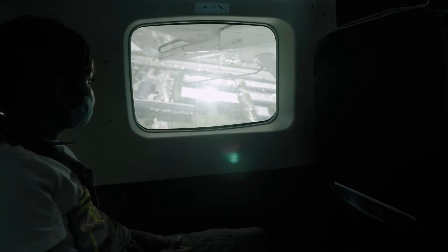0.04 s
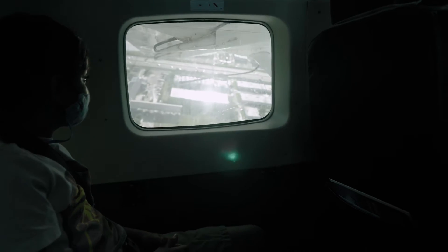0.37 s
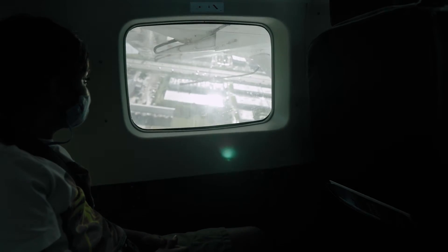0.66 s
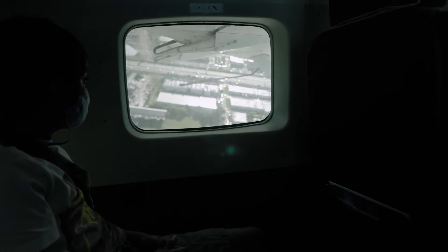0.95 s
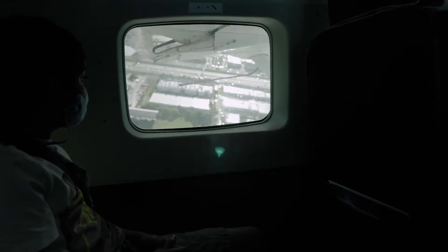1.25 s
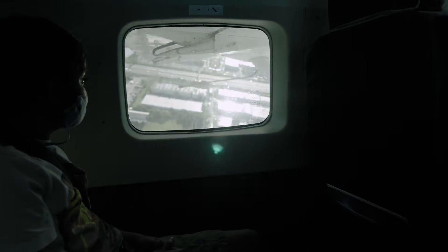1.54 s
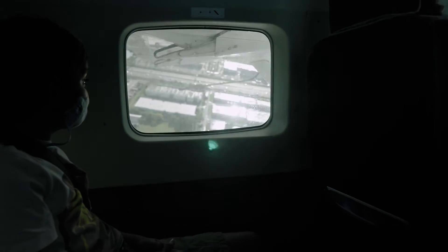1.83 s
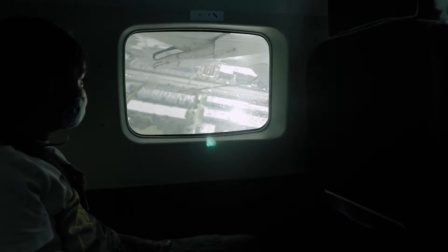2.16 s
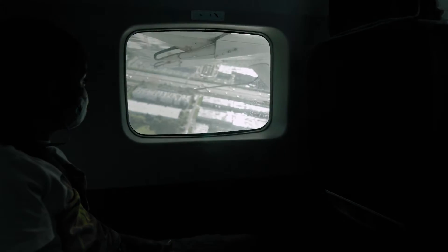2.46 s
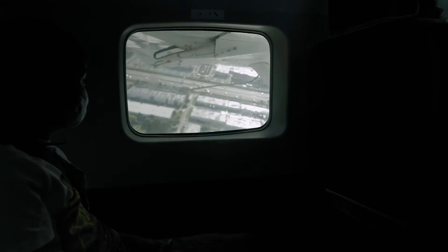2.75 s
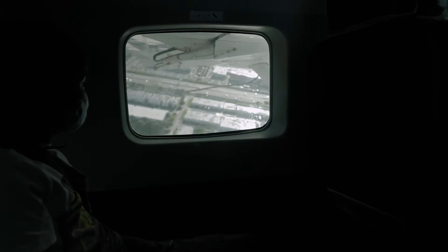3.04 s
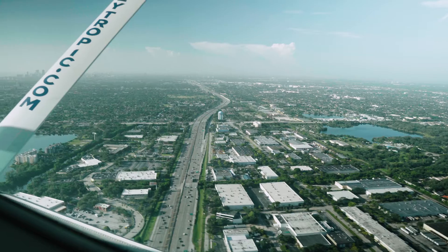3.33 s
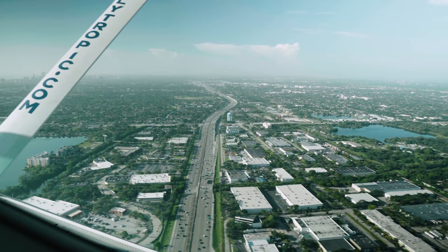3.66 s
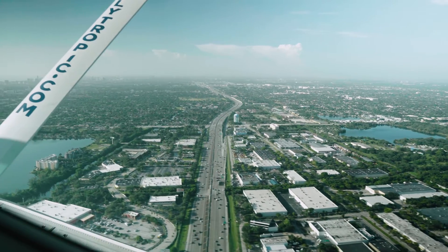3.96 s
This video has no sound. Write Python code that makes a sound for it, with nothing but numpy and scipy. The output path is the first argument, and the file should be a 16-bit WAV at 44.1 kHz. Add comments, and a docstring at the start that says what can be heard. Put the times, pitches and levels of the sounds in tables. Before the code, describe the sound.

Heard from inside a small cruising plane, the propeller drones steadily under a rush of air and a faint high whine. Late on, the sound shifts to a spot by the wing, with more drone and less air.

```python
"""A steady propeller drone fills the cabin of a small turboprop in cruise, beaten out by the blades. Air rushes
over the fuselage, the turbine whines thinly above it, and the propeller shaft and engine accessories hum
faintly. A loose panel taps once. Near the end the sound crossfades from a rear seat to a place by the wing
strut: more drone, less rush."""
import sys
import numpy as np
from scipy import signal
from scipy.fft import rfft, irfft
from scipy.io import wavfile

SR = 44100
rng = np.random.default_rng(int(sys.argv[2]) if len(sys.argv) > 2 else 0)


def materialize(psi):
    """Save the field psi as 16-bit PCM at rate SR to the path in sys.argv[1].

    A 1-D psi becomes a single channel; in a 2-D psi each row is a channel.
    """
    bounded = np.clip(np.atleast_2d(psi).T, -1, 1)
    quanta = np.round(bounded * 32767).astype(np.int16)
    wavfile.write(sys.argv[1], SR, quanta)


N = 176400
TIME = np.arange(N) / SR
HZ = np.fft.rfftfreq(N, 1 / SR)

# swell of the lowest blade tone (time [s], gain [dB])
DRONE_SWELL = [(0, 1), (.85, 0.5), (1.02, -0.5), (1.3, 2), (1.75, 0), (2.3, 0.5), (2.46, -2), (2.58, 1),
               (2.85, 0.5), (3.02, -1.5), (3.2, 0), (3.31, -6), (3.43, 1), (3.8, 0), (4, .5)]


def amp(db):
    """Decibels to gain."""
    return 10 ** (np.asarray(db) / 20)


def unit_rms(x):
    """Scales to unit rms."""
    return x / np.sqrt(np.mean(x ** 2) + 1e-20)


def over_time(points):
    """Linear interpolation of (time [s], value) points."""
    return np.interp(TIME, *np.transpose(points))


def over_hz(points):
    """Interpolates each column of a (frequency [Hz], ...) table on a log axis."""
    hz, *columns = np.transpose(points)
    return [np.interp(np.log(HZ + 1), np.log(hz + 1), column) for column in columns]


def white_spectrum():
    """Spectrum of unit white noise."""
    return rfft(rng.standard_normal(N))


def wander(rate_hz):
    """Smooth random motion of unit rms."""
    return unit_rms(irfft(white_spectrum() * (HZ > 0) / (1 + (HZ / rate_hz) ** 4), N))


def propeller(harmonics, blade_cycles, low_gain, lead_rad, balance_db, waver, waver_hz):
    """Blade harmonics; turbulence makes the higher ones waver more, partly apart at each ear."""
    out = np.zeros((2, N))
    side = np.array([[.5], [-.5]])  # left, right
    for k, (_, db) in enumerate(harmonics, 1):
        shared = wander(waver_hz) + 1j * wander(waver_hz)
        apart = wander(waver_hz) + 1j * wander(waver_hz)
        turbulence = 1 + waver * np.sqrt(k - .8) * (shared + side * apart)
        phase = 2 * np.pi * (k * blade_cycles + rng.random()) + side * lead_rad
        gain = low_gain if k == 1 else amp(side * balance_db)
        out += np.sqrt(2) * amp(db) * gain * (turbulence * np.exp(1j * phase)).real
    return out


def airflow(spectrum, ears, blade_cycles, gain_db, gust_db, gust_hz, rush_from_hz=280, chop_depth=.03):
    """Turbulent air on the fuselage: steady rumble, and a rush that flutters and pulses with the blades."""
    # swell of the rush (time [s], gain [dB])
    rush_swell = [(0, 1.3), (.12, 0.5), (.19, -1.4), (.3, 0), (.68, 1), (.95, 0.5), (1.1, 0.7), (1.3, 0.4),
                  (1.5, 0.1), (1.7, 0.7), (1.9, 0.3), (2.35, 0.8), (2.57, 2.1), (2.67, -0.7), (2.8, 1),
                  (2.92, -.3), (2.96, -4.5), (3.02, -0.5), (3.3, -0.5), (3.5, -1), (4, -0.3)]
    coherence, lead_rad, balance_db = over_hz(ears)
    left = white_spectrum()
    right = (coherence * left + np.sqrt(1 - coherence ** 2) * white_spectrum()) * np.exp(-1j * lead_rad)
    air = np.array([left * amp(balance_db / 2), right * amp(-balance_db / 2)])
    air *= amp(over_hz(spectrum)[0] + gain_db) * np.sqrt(SR / 2)
    air *= HZ ** 2 / (HZ ** 2 + 10 ** 2)  # 10 Hz high-pass
    rush_band = HZ ** 2 / (HZ ** 2 + rush_from_hz ** 2)
    rumble = irfft(air * (1 - rush_band), N)
    rush = irfft(air * rush_band, N)
    flutter = amp(over_time(rush_swell) + gust_db * wander(gust_hz))
    chop = 1 + chop_depth * np.cos(2 * np.pi * blade_cycles)
    return rumble + rush * flutter * chop


def turbine(blade_cycles, drift_hz=2.5, skirt_hz=900, flicker_db=.6):
    """Fuzzy compressor whistles, plus thin tones with sidebands one blade rate away."""
    # compressor whistles (centre [Hz], width [Hz], base level [dB])
    whistles = [(9900, 200, -49.5), (12170, 300, -63)]
    # turbine tones (frequency [Hz], base level [dB], sidebands re tone [dB])
    tones = [(9822, -58.5, -1.5), (11031, -69, -12), (12081, -66.5, -3), (12645, -69.5, 0)]
    # turbine swell (time [s], gain [dB])
    swell = [(0, 0.5), (.75, 1), (1.35, -0.5), (2, 1), (2.35, 2.5), (2.65, 2), (3, 0.5), (3.25, 1),
             (3.45, -2.5), (4, -3.5)]
    out = np.zeros((2, N))
    drift_cycles = drift_hz * np.cumsum(wander(5.8)) / SR
    for ear in out:
        for hz, width_hz, db in whistles:
            skirt = np.exp(-((HZ - hz) / skirt_hz) ** 2)
            band = skirt / np.sqrt(1 + (2 * (HZ - hz) / width_hz) ** 2)
            ear += amp(db + flicker_db * wander(15)) * unit_rms(irfft(white_spectrum() * band, N))
        for hz, db, sideband_db in tones:
            for k in (-1, 0, 1):
                cycles = hz * TIME + drift_cycles + k * blade_cycles + rng.random()
                phase = 2 * np.pi * cycles + .5 * wander(8)
                ear += np.sqrt(2) * amp(db + abs(k) * sideband_db) * np.cos(phase)
    return out * amp(over_time(swell))


def faint_hum(waver_db=2, waver_rad=.52):
    """Weak wavering tones under the drone: one at four times the propeller shaft rate, two higher ones from
    engine accessories."""
    # hum tones (frequency [Hz], level [dB])
    tones = [(125.5, -38.5), (1160, -52), (1911, -55)]
    out = np.zeros(N)
    for hz, db in tones:
        gain = np.sqrt(2) * amp(db + waver_db * wander(4))
        out += gain * np.cos(2 * np.pi * hz * TIME + waver_rad * wander(6))
    return out


def panel_tap(rise_s=.003, t60_s=.035):
    """A loose trim panel taps; its modes die at once."""
    # taps (start [s], gain [dB])
    taps = [(1.590, -20)]
    # panel modes (frequency [Hz], relative level [dB])
    modes = [(850, -2), (970, -0.5), (1210, -6), (1440, -12)]
    out = np.zeros(N)
    for start_s, db in taps:
        age_s = np.maximum(TIME - start_s, 0)
        ring = sum(amp(mode_db) * np.sin(2 * np.pi * (hz * age_s + rng.random())) for hz, mode_db in modes)
        attack = np.minimum(age_s / rise_s, 1)
        decay_db = 60 * np.maximum(age_s - rise_s, 0) / t60_s
        out += attack * amp(db - decay_db) * ring
    return out


def rear_seat(blade_cycles, throb_db=.5, throb_hz=7.6):
    """Rear seat: unevenly throbbing drone, airflow, hum and the panel tap."""
    # blade harmonics (multiple, base level [dB])
    harmonics = [(1, -15), (2, -32.5), (3, -28), (4, -29), (5, -41.5), (6, -48), (7, -43), (8, -45),
                 (9, -45.5), (10, -50.5), (11, -48), (12, -49), (13, -56), (14, -55), (15, -52), (16, -67),
                 (17, -53.5)]
    # airflow spectrum (frequency [Hz], base density [dB/Hz])
    spectrum = [(20, -61), (40, -49), (65, -42), (90, -37.5), (145, -41), (172, -48), (200, -43.5),
                (300, -46.5), (420, -49), (480, -51), (550, -54.5), (700, -58), (850, -59), (1000, -62),
                (1300, -64), (1800, -67.5), (2100, -68), (2600, -71.5), (3700, -70.5), (5200, -76),
                (7000, -78), (8800, -83.5), (12300, -84), (15500, -88.5)]
    # airflow between the ears (frequency [Hz], coherence [0-1], left lead [rad], left - right [dB])
    ears = [(40, 1, 0.1, -16), (90, 0.76, -0.47, 2.5), (173, 0.54, -0.26, 1.5), (453, .26, 0.25, -0.5),
            (830, 0.46, -0.35, -1.5), (1200, 0.57, -0.04, -3), (3500, 0.42, 0.07, 0.5),
            (7000, 0.08, 0.2, 0), (13000, 0.23, -.7, -1.8)]
    low_gain = amp(over_time(DRONE_SWELL) + throb_db * wander(throb_hz))
    drone = propeller(harmonics, blade_cycles, low_gain,
                      lead_rad=.17, balance_db=-1, waver=.069, waver_hz=4.3)
    air = airflow(spectrum, ears, blade_cycles, gain_db=-.5, gust_db=.53, gust_hz=30)
    return drone + air + faint_hum() + panel_tap()


def by_wing_strut(blade_cycles):
    """By the wing strut: stronger drone, weaker airflow."""
    # blade harmonics (multiple, base level [dB])
    harmonics = [(1, -12), (2, -23), (3, -26.5), (4, -37), (5, -39), (6, -47), (7, -50)]
    # airflow spectrum (frequency [Hz], base density [dB/Hz])
    spectrum = [(20, -65), (40, -50), (65, -47), (90, -44.5), (140, -43.5), (172, -46), (205, -46),
                (300, -50.5), (420, -54.5), (550, -57.5), (700, -61), (850, -61), (1000, -67), (1500, -69),
                (1800, -69), (2250, -74), (3700, -74), (5200, -79.5), (7000, -82), (8800, -85.5),
                (12300, -87.5), (15500, -95)]
    # airflow between the ears (frequency [Hz], coherence [0-1], left lead [rad], left - right [dB])
    ears = [(40, .98, -.15, .5), (200, 0.76, -0.7, 1), (600, 0.8, -0.55, 0.91), (1100, 0.5, -.8, 0),
            (1800, 0.64, -.3, 0), (7000, .16, -.2, 1), (13000, .25, -.4, 0)]
    low_gain = amp(over_time(DRONE_SWELL))
    drone = propeller(harmonics, blade_cycles, low_gain,
                      lead_rad=.3, balance_db=2.5, waver=.06, waver_hz=3.2)
    return drone + airflow(spectrum, ears, blade_cycles, gain_db=.5, gust_db=.45, gust_hz=40)


def scene(blade_hz=94.12, fade_mid_s=3.34, fade_length_s=.12):
    """One engine from two places in turn; the turbine runs on through the equal-power crossfade."""
    blade_cycles = np.cumsum(blade_hz + .038 * wander(1.5)) / SR
    rear = rear_seat(blade_cycles)
    strut = by_wing_strut(blade_cycles)
    fade_rad = np.pi / 2 * np.clip((TIME - fade_mid_s) / fade_length_s + .5, 0, 1)
    return rear * np.cos(fade_rad) + strut * np.sin(fade_rad) + turbine(blade_cycles)


def record(dry):
    """Steep low-pass on the top treble."""
    cutoff_hz = 15720
    lowpass = signal.firwin(1023, cutoff_hz, window=("kaiser", 9), fs=SR)
    return signal.oaconvolve(dry, lowpass[None], "same")


dry = scene()
out = record(dry)
materialize(out)
```